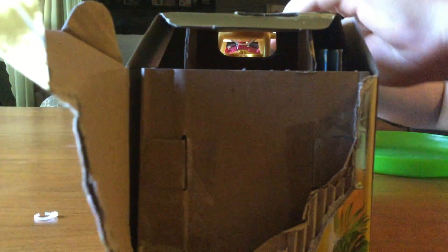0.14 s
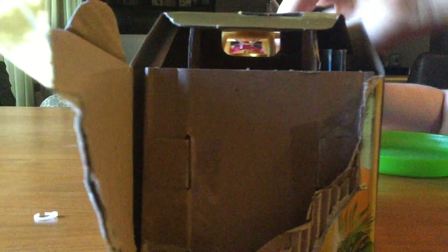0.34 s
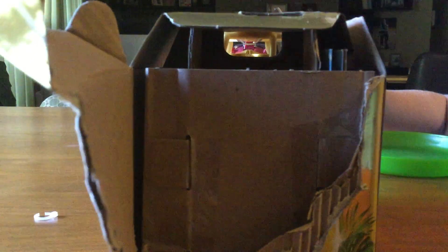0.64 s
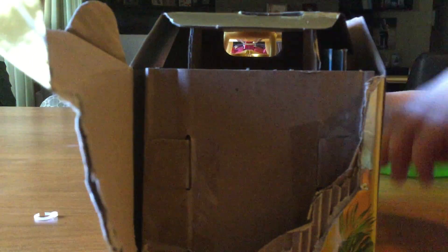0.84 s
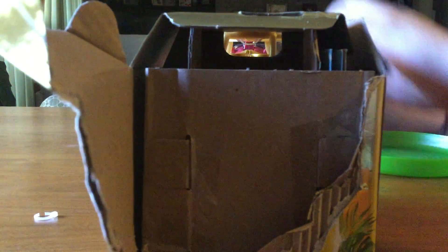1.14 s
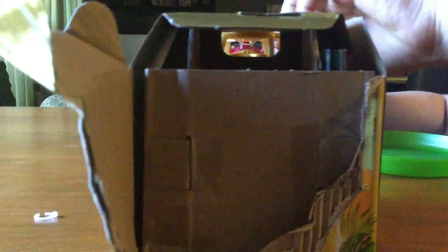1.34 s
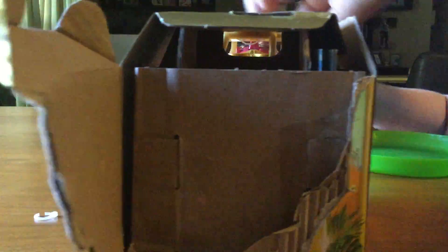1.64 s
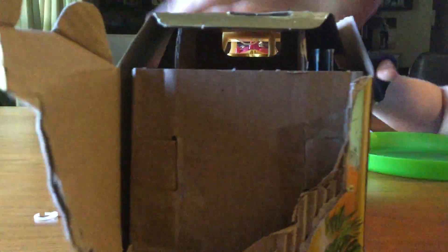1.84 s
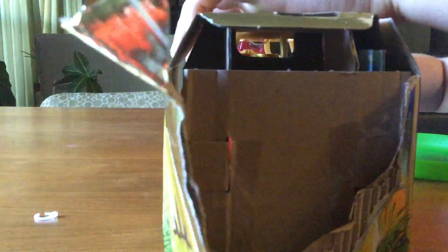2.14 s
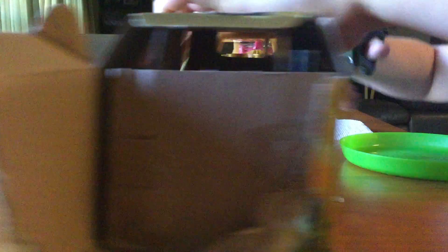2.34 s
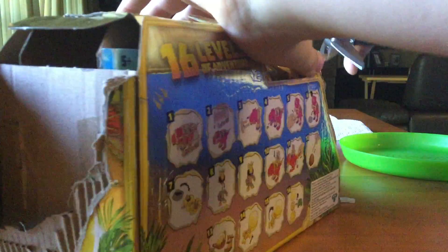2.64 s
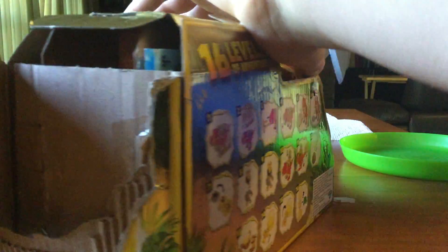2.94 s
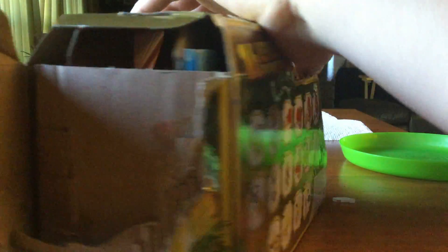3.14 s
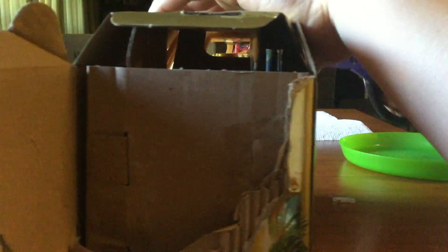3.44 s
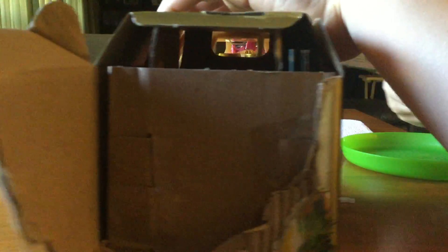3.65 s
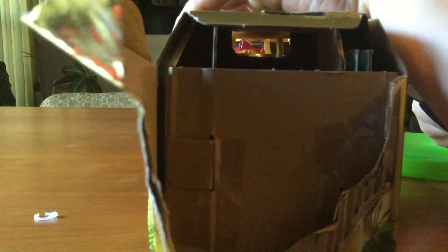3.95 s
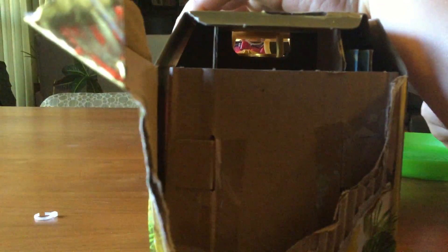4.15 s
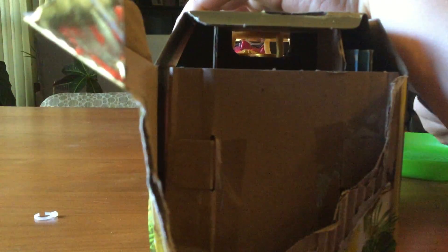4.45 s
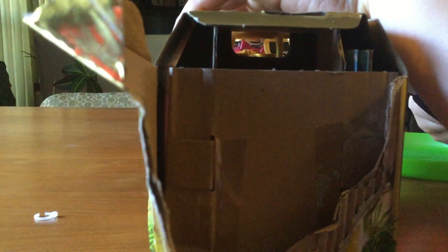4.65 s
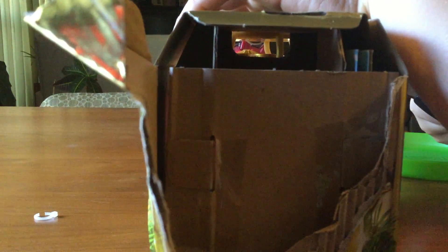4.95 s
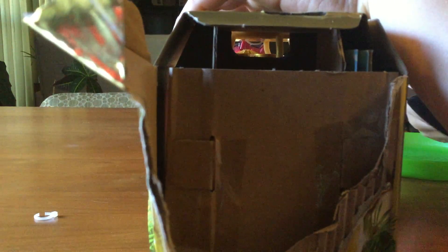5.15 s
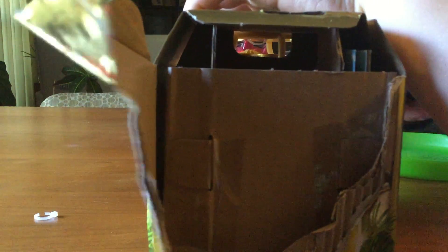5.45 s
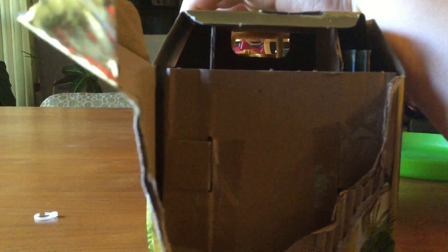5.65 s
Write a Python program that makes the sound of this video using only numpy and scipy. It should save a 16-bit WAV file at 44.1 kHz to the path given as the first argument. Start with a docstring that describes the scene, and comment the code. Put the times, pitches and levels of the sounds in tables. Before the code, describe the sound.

A table-level microphone hears a cardboard box being handled in a quiet furnished room, with faint hiss and low table tremble. Soft brushes and dull knocks begin at 0.1 s, then four snaps of scissors cutting plastic ties come at about 0.3, 0.35, 0.43 and 0.47 s, the last two brightest and strongest, ringing shortly in the room. From 1.1 to 1.6 s there are only tiny clicks and faint taps. At 1.88 s a hard, hollow knock on the cardboard is loudest, with a thump and rustling after it. The box scrapes dry and gritty from 2.3 to 2.75 s, strongest near 2.5, ending in a bright click. Fainter rubbing and knocks follow around 3 s; a deep bump lands at 3.46, a crisp knock at 3.58. After 4.1 s it is mostly still, with taps at 4.6 and 5.05, clicks at 5.13 and 5.35, and a small cluster of knocks and brushing from 5.5 s.

```python
"""Faint brushes and knocks lead into four sharp snaps that ring in the room: scissors snip plastic ties.
Their cardboard box is then tapped, turned and slid on a wooden table, with small clicks at the box.
Noisy contacts ring the box modes; sliding is dense tiny slips through cardboard, edge and air colours.
The microphone stands on the same table, so bumps arrive as low thumps; a furnished room rings briefly."""
import sys
import numpy as np
from scipy import signal
from scipy.fft import rfft, irfft
from scipy.io import wavfile
from scipy.ndimage import uniform_filter1d

SR = 44100
rng = np.random.default_rng(int(sys.argv[2]) if len(sys.argv) > 2 else 0)


def boost_factor(decibels):
    """Convert a level in decibels to a linear amplitude factor."""
    exponent = np.asarray(decibels, float) / 20
    return 10 ** exponent


def wrap_up_sound(samples):
    """Save the sound to the file named by the first command line argument, as 16-bit audio."""
    columns = np.atleast_2d(samples).T
    # keep every value between -1 and 1, then stretch to whole-number steps
    tamed = np.clip(columns, -1, 1)
    steps = np.round(tamed * 32767).astype(np.int16)
    wavfile.write(sys.argv[1], SR, steps)


N = 255339  # samples

# modes of the cardboard box, decay before each use scales it: pitch_hz, level_db, t60_s
BOX_MODES = [(332, -1.5, 0.084), (407, -6, 0.042), (530, -1.5, 0.021), (611, -2.5, .04), (712.7, 1, 0.046),
             (815, -7, 0.073), (1130, -3, 0.035), (1183, 9.5, 0.013), (1450, 5, 0.014), (1592, 0.5, 0.015),
             (1776, -0.5, 0.01)]
# modes of the table top, decay before each use scales it: pitch_hz, level_db, t60_s
TABLE_MODES = [(50, -6.5, 0.15), (94, -2.5, 0.072), (117.1, -2.5, 0.21), (136.5, 6, 0.077),
               (165, -4.5, 0.19), (201, 1.5, 0.14), (273, 0.5, 0.14)]
# colour of the airy treble, relative: frequency_hz, level_db
AIR_TREBLE = [(4710, -15), (8000, -6), (8830, -8.5), (10400, -9), (13200, -3.5), (16000, -11.5)]
# the box is turned round on the table and back: time_s, rub_db, box_body_db
SLIDE_PATH = [(2.29, -79, -74), (2.34, -61, -64.5), (2.47, -46.5, -59), (2.57, -48.5, -59),
              (2.73, -53, -60.5), (2.76, -64.5, -60.5), (2.79, -68.5, -89), (2.865, -80, -80),
              (2.962, -58.5, -61.5), (3.03, -72, -66), (3.11, -74.5, -74), (3.248, -59.5, -62.5),
              (3.396, -58.5, -64.5), (3.504, -62.5, -58), (3.54, -100, -79), (3.598, -54.5, -58),
              (3.654, -76, -80), (3.72, -69, -66.5), (3.978, -59, -63.5), (4.032, -81, -74),
              (4.05, -70.5, -76), (4.101, -89.5, -71)]


def evened(x):
    """Scales to rms 1."""
    return x / np.sqrt(np.mean(x ** 2) + 1e-20)


def read(points, hz):
    """Reads a table on a log-frequency axis."""
    f, value = np.transpose(points)
    return np.interp(np.log(hz + 1), np.log(f + 1), value)


def add(mix, s, sound):
    """Mixes a sound in at s seconds."""
    part = mix[round(s * SR):][:len(sound)]
    part += sound[:len(part)]


def coloured(x, points):
    """Filters by a spectrum."""
    gain_db = read(points, np.fft.rfftfreq(len(x), 1 / SR))
    return irfft(rfft(x) * boost_factor(gain_db), len(x))


def resonate(x, hz, width_hz):
    """A resonance that follows the curve hz: shift to zero pitch, smooth, shift back."""
    turn = np.exp(2j * np.pi * np.cumsum(hz) / SR)
    r = np.exp(-np.pi * width_hz / SR)
    return 2 * (turn * signal.lfilter([1 - r], [1, -r], x / turn)).real


def ring(modes, factor, favour_hz, octaves, size=8192):
    """The answer of an object to one sharp blow; the struck spot favours the modes near one pitch."""
    hz, db, t60 = np.transpose(modes)[:, :, None]
    t = np.arange(size) / SR
    db = db - 6 * (np.log2(hz / favour_hz) / octaves) ** 2
    decay_db = -60 * t / (t60 * np.clip(factor, .2, 4))
    return (boost_factor(db + decay_db) * np.sin(2 * np.pi * hz * t)).sum(0)


def struck(force, answer, db):
    """Drives an object's answer with a force and scales the result to a peak level."""
    sound = signal.fftconvolve(force, answer)
    return boost_factor(db) * sound / abs(sound).max()


def quiet():
    """Still air and microphone hiss: steady coloured noise."""
    # colour of the quiet, relative: frequency_hz, level_db
    hush = [(12, -46), (20, -26), (38, -13.5), (172, -6), (459, -18.5), (513, -19.5), (558, -20),
            (698, -20.5), (949, -28), (1090, -26.5), (2140, -33.5), (4180, -31), (4810, -34.5), (8410, -37),
            (16000, -39.5)]
    return boost_factor(-70) * evened(coloured(rng.standard_normal(N), hush))


def room(x):
    """Sparse reflections of random sign, each band dying at its own speed."""
    # decay of the room: frequency_hz, t60_s
    decay = [(200, 0.22), (1000, 0.5), (4000, 0.45), (8000, 0.45), (12000, 0.22), (16000, 0.18)]
    taps = np.zeros(SR // 2)
    at = np.arange(240, SR // 2 - 20, 20)
    taps[at + rng.integers(0, 20, len(at))] = rng.choice([-1., 1.], len(at))
    hz, t, z = signal.stft(taps, SR, nperseg=256)
    fade_db = -60 * t / read(decay, hz)[:, None]
    tail = signal.istft(z * boost_factor(fade_db), SR, nperseg=256)[1]
    return signal.fftconvolve(x, tail / np.linalg.norm(tail))[:N]


def wall(x):
    """One clear echo from the nearest wall, spread over some ms by the furniture."""
    delay_s, centre_s, spread_s, level_db = 0.034, .012, 0.0067, -17.5
    t = np.arange(1500) / SR
    smear = np.exp(-.5 * ((t - centre_s) / spread_s) ** 2) * rng.standard_normal(len(t))
    out = np.zeros(N)
    add(out, delay_s - centre_s, signal.fftconvolve(x, smear / np.linalg.norm(smear)))
    return boost_factor(level_db) * out


def tremble():
    """Under resting arms and the moving box, lumpy low pushes keep the table modes stirring."""
    # strength of the trembling, joined by straight lines: time_s, level_db
    unrest = [(0.0, -60), (0.11, -71), (0.45, -55.5), (0.75, -70), (1.51, -64.5), (1.68, -67.5),
              (2.05, -57), (2.34, -68.5), (2.71, -62), (2.95, -55), (3.25, -70), (3.64, -58), (3.77, -65.5),
              (4.18, -64), (4.66, -75), (5.03, -62.5), (5.34, -78.5), (5.63, -56.5), (5.79, -77)]
    lumps_db = 3.5 * np.clip(evened(uniform_filter1d(rng.standard_normal(N), 2500)), -2, 2)
    force = boost_factor(lumps_db) * rng.standard_normal(N)
    shake = signal.oaconvolve(force, ring(TABLE_MODES, 0.16, 180, 3.2))[:N]
    s, level_db = np.transpose(unrest)
    return boost_factor(np.interp(np.arange(N) / SR, s, level_db)) * evened(shake)


def bumps():
    """Soft pushes ring the table top and travel through it to the microphone."""
    # thumps, pitch being what the spot favours: start_s, peak_db, half_push_ms, pitch_hz
    thumps = [(0.1, -45, 2.6, 286), (0.353, -48, 1.3, 208), (0.454, -41.5, 1.04, 302),
              (0.481, -41, 1.5, 293), (1.48, -56, 4.1, 127.6), (1.888, -28, 2.2, 133),
              (2.489, -49, 1.9, 115), (2.764, -36.5, 6.1, 109), (2.823, -46, 1.7, 62.4),
              (2.966, -44.5, 1.8, 128), (3.016, -44, 0.64, 123), (3.048, -49, 1.8, 193),
              (3.457, -20.5, 2.93, 126), (3.468, -21, 4.9, 86), (3.585, -40.5, 1.9, 67),
              (3.74, -43, 4.5, 316), (3.976, -39, 1.8, 125), (4.622, -39.5, 1.06, 139.5),
              (5.047, -46.5, 3.1, 185), (5.457, -50.5, 5.4, 87.4), (5.548, -39.5, 2.75, 162)]
    out = np.zeros(N)
    swell = 1 - np.exp(-np.arange(16000) / SR / 0.0066)  # the slab takes a few ms to start moving
    for s, db, ms, hz in thumps:
        push = np.hanning(round(2 * ms * SR / 1000) + 3)
        answer = swell * ring(TABLE_MODES, 1.0, hz, .7, size=16000)
        add(out, s, struck(-push, answer, db))
    return out


def strokes():
    """The slide and every brush as (samples, rub dB, body dB), brushes swelling to one strongest moment."""
    # short brushes of hands and flaps: start_s, strongest_s, end_s, rub_db, box_body_db
    brushes = [(0, -0.011, 0.052, -69, -65.5), (0.117, 0.152, 0.23, -71.5, -56.5),
               (0.371, 0.365, 0.4, -66, -52), (0.395, 0.418, 0.43, -69, -49.5),
               (1.132, 1.142, 1.2, -67, -85), (1.363, 1.388, 1.5, -70, -68),
               (1.644, 1.746, 1.83, -66, -63.5), (1.817, 1.855, 1.88, -64, -71),
               (1.866, 1.922, 2.1, -55.5, -44), (2.063, 2.118, 2.25, -52.5, -55),
               (4.862, 4.899, 4.93, -85.5, -71.5), (5.49, 5.547, 5.7, -61, -58),
               (5.731, 5.761, 5.79, -67.5, -57)]
    ends_db, roundness = -21, 1.19  # level at both ends under the strongest moment; shape of the swell
    s, rub_db, body_db = np.transpose(SLIDE_PATH)
    at = np.arange(round(s[0] * SR), round(s[-1] * SR))
    out = [(at, np.interp(at / SR, s, rub_db), np.interp(at / SR, s, body_db))]
    for start, top, end, rub_db, body_db in brushes:
        at = np.arange(round(start * SR), min(round(end * SR), N))
        swell_db = ends_db * np.interp(at / SR, (start, top, end), (1, 0, 1)) ** roundness
        out.append((at, rub_db + swell_db, body_db + swell_db))
    return out


def rubbing():
    """Dense tiny slips, in clumps, over smooth friction; they pass edge, box and air."""
    # colour of cardboard friction, relative: frequency_hz, level_db
    friction = [(1180, -33.5), (2000, -11), (2850, -7.5), (3370, -5.5), (3660, -6.5), (4310, -7),
                (4680, -5), (6610, -9), (7840, -20.5), (9000, -23.5), (11700, -47.5), (19800, -120)]
    hard_rub_db, hard_treble_db, treble_slope = -47, -59, 1.2  # the treble grows faster than the rub
    edge_hz, edge_hz_per_db = 5300, 54.5  # the edge sings higher when the slide presses harder
    slips_per_s = 300

    clumps = boost_factor(1.3 * evened(uniform_filter1d(rng.standard_normal((3, N)), 500)))
    slip_size = boost_factor(3.5 * np.minimum(rng.exponential(1, N), 4))
    slips = (rng.random(N) < slips_per_s / SR) * slip_size
    force = clumps * rng.standard_normal((3, N)) * (1 + 9 * uniform_filter1d(slips, 40))

    # the paper surface changes under the stroke, so patches of colour come and go
    z = signal.stft(force, nperseg=256)[2]
    patches = uniform_filter1d(rng.standard_normal(z.shape[1:]), 4, 0)
    patches_db = 2.0 * evened(uniform_filter1d(patches, 24, 1))
    force = signal.istft(z * boost_factor(patches_db), nperseg=256)[1][:, :N]

    body = evened(signal.oaconvolve(force[1], ring(BOX_MODES, 0.9, 1100, 2.1))[:N])
    broad = evened(coloured(force[0], friction))
    air = evened(coloured(force[2], AIR_TREBLE))

    # the dragged edge sings in a fuzzy band that wanders with pressure
    s, press_db = np.transpose(SLIDE_PATH)[:2]
    press_db = np.interp(np.arange(N) / SR, s, press_db, -60, -60)
    wander = 1 + 0.027 * evened(uniform_filter1d(rng.standard_normal(N), 5000))
    hz = (edge_hz + edge_hz_per_db * (press_db - hard_rub_db)) * wander
    edge = evened(broad + 0.85 * resonate(broad, hz, 600))

    out = np.zeros(N)
    for at, rub_db, body_db in strokes():
        air_db = hard_treble_db + treble_slope * (rub_db - hard_rub_db)
        sound = boost_factor(rub_db) * edge[at] + boost_factor(body_db) * body[at] + boost_factor(air_db) * air[at]
        out[at] += sound * signal.windows.tukey(len(at), min(900 / len(at), 1))
    return out


def contacts(rows):
    """Rough contacts crack, spit treble and ring the box: (s, crack dB, body dB, treble dB, ms, Hz)."""
    # colour of the crack, relative: frequency_hz, level_db
    crack_colour = [(1060, -22), (1800, -8), (2540, -6), (4130, 0), (4830, -1.5), (5540, -5), (5870, -8.5),
                    (6350, -7.5), (7420, -23.5), (8070, -33), (8500, -24.5), (11000, -47), (18700, -120)]
    lead_s = .012  # pressure builds this long before the break
    out, t = np.zeros(N), np.arange(2048) / SR
    grit = rng.standard_normal((len(rows), 4, 2048))
    grit[:, 3] = np.repeat(grit[:, 3, :32], 64, axis=1)  # the settling comes in short bursts
    impulse = np.eye(1, 256, 40)[0]  # 40 samples late, so crack and air start .001 s early below
    crack, air = coloured(impulse, crack_colour), coloured(impulse, AIR_TREBLE)
    for (s, crack_db, body_db, air_db, ms, hz), g in zip(rows, grit):
        u = 1000 * np.maximum(t - lead_s, 0) / np.clip(ms, .2, 8)
        # pressure creaks up to the break, a short blow, then loose flaps settle behind it
        creak = .05 * np.exp((t - lead_s) / .004) * (t < lead_s)
        blow = u * np.exp(-u)
        clatter = .04 * (1 - np.exp(-u)) * np.exp(-t / .025) * np.minimum(abs(g[3]), 2)
        contact = creak + blow + clatter
        # the box also gets one clean knock at the break
        knock = 0.55 * np.exp(-.5 * ((t - lead_s - .0006) / .00008) ** 2)
        box_force = knock + 1.1 * (contact - creak) * g[1]
        small = signal.butter(4, .65 * hz, "high", fs=SR, output="sos")  # a small patch radiates no bass
        answer = signal.sosfilt(small, ring(BOX_MODES, .9, hz, 0.7, size=4096))
        s -= lead_s
        add(out, s - .001, struck(contact * g[0], crack, crack_db))
        add(out, s, struck(box_force, answer, body_db))
        add(out, s - .001, struck(contact * g[2], air, air_db))
    return out


def small_clicks():
    """Small clicks and snaps at the box, some thin, some ringing the cardboard, favour one box pitch."""
    # clicks, peak levels: start_s, crack_db, box_body_db, treble_db, contact_ms
    click_rows = [(0.1684, -52, -61, -78, 1.4), (0.1855, -52, -57, -61.5, 0.54),
                  (0.304, -43, -61.5, -59, 1.3), (1.1316, -44.5, -81, -51.5, 0.89),
                  (1.1434, -62.5, -73, -56.5, 1.24), (1.2172, -56.5, -79, -62.5, 2.1),
                  (1.26, -57, -78, -60.5, 1.3), (1.3104, -59.5, -75.5, -65, 1.6),
                  (1.851, -43.5, -60.5, -71.5, 1.1), (1.9806, -41.5, -60, -53, 1.1),
                  (2.7214, -58, -40, -49, 1.5), (2.766, -40.5, -65, -32.5, 2.1),
                  (3.4984, -56, -50, -55, 1.03), (5.1331, -42.5, -39.5, -51, 0.7),
                  (5.349, -45.5, -43.5, -56, 0.71), (5.5312, -48, -50.5, -65.5, 1.2),
                  (5.609, -44, -58, -73.5, 0.65), (5.763, -52.5, -50, -75, 1)]
    return contacts([(*row, 1350) for row in click_rows])  # Hz


def knocks():
    """Fingers and scissors knock the dull cardboard, which rings with little treble."""
    # knocks, pitch being what the spot favours: start_s, crack_db, box_body_db, contact_ms, pitch_hz
    hits = [(0.0903, -47, -35, 1.5, 620), (0.1182, -37.5, -30, 1.32, 1660), (0.441, -50.5, -29.5, 4, 554.6),
            (0.482, -49.5, -30, 5, 450), (1.361, -67, -51, 3.1, 630), (1.3897, -61.5, -55, 1.9, 1480),
            (1.5655, -67.5, -51.5, 5.8, 1045), (1.5968, -48, -43.5, 0.5, 1020),
            (1.8823, -18.5, -14, 0.75, 1450), (1.898, -50.5, -32, 3, 1190), (1.9934, -48, -33.5, 0.89, 454),
            (2.151, -42, -32.5, 1.3, 1130), (2.26, -52, -46.5, 2.1, 960), (2.592, -57, -41.5, 2.4, 1170),
            (2.6739, -75, -44.5, 0.37, 505), (2.875, -58, -47, 2.8, 540), (2.9054, -51.5, -46.5, 0.56, 590),
            (2.9486, -43.5, -50, 2.8, 606), (2.9893, -53, -46.5, 3, 585), (3.017, -49.5, -41.5, 2.3, 540),
            (3.478, -66, -46, 4.4, 534), (3.5809, -29.5, -36, 1.2, 530), (3.979, -46.5, -42, 4.1, 704),
            (4.0468, -48.5, -44.5, 1.7, 440), (4.059, -60, -49, 2.1, 590), (4.6263, -45.5, -35.5, 2.3, 611),
            (4.666, -68.5, -53, 1.65, 690), (5.058, -53, -44, 4.7, 402), (5.5504, -48, -41.5, 1.5, 1130),
            (5.5588, -40.5, -36, 1.4, 690), (5.5906, -38, -34.5, 2.1, 690), (5.7442, -61, -53.5, 4.8, 740)]
    treble_db = -24  # under the crack
    return contacts([(s, db, body_db, db + treble_db, ms, hz) for s, db, body_db, ms, hz in hits])


def snaps():
    """Plastic ties snap in the scissors above the box, open to the room, and the box rings a little over each
    crack."""
    # snaps, pitch being what the struck spot favours: start_s, crack_db, treble_db, contact_ms, pitch_hz
    cuts = [(0.2936, -40, -43, 0.71, 1500), (0.3471, -36, -44.5, 1.9, 554), (0.4327, -22, -32, 1.4, 1350),
            (0.473, -19, -19, 2.2, 1670)]
    body_db = 2  # over the crack
    return contacts([(s, db, db + body_db, air_db, ms, hz) for s, db, air_db, ms, hz in cuts])


def scene():
    """Contacts and rubbing ring in the room; the table carries the bass straight to the microphone."""
    snap, tap, rub = snaps(), knocks() + small_clicks(), rubbing()
    # knocks and small clicks reach the room less than the four sharp snaps
    spread = snap + rub + boost_factor(-6) * tap
    near = snap + tap + rub
    echoes = boost_factor(-13) * room(spread) + wall(spread)
    return (near + echoes + bumps() + tremble() + quiet())[None]


def band_limit(x):
    """A steep low-pass at the top of the band."""
    return signal.sosfilt(signal.butter(12, 16470, fs=SR, output="sos"), x)


def record(dry):
    """The microphone loses the deepest bass, its opening resonates, and the top is cut."""
    dry = signal.sosfilt(signal.butter(4, 45, "high", fs=SR, output="sos"), dry)
    opening_hz, width_hz, opening_db = 4250, 300, -6
    dry = dry + boost_factor(opening_db) * resonate(dry[0], np.full(N, opening_hz), width_hz)
    top = signal.firwin(255, 15900, window=("kaiser", 7), fs=SR)
    mix = signal.oaconvolve(dry, top[None], "same")
    return band_limit(mix)


dry = scene()
out = record(dry)
wrap_up_sound(out)
```